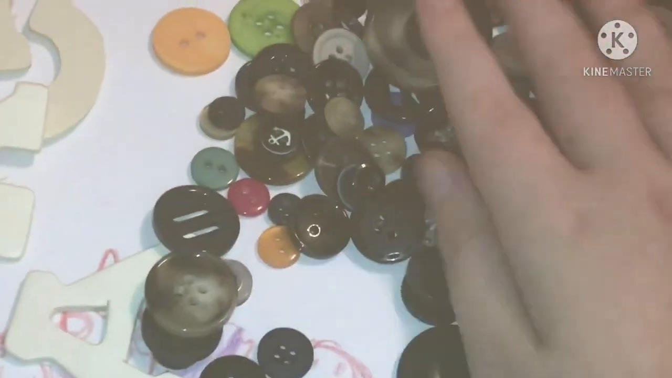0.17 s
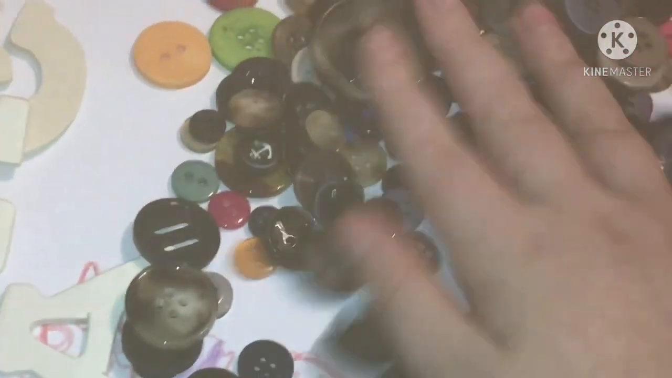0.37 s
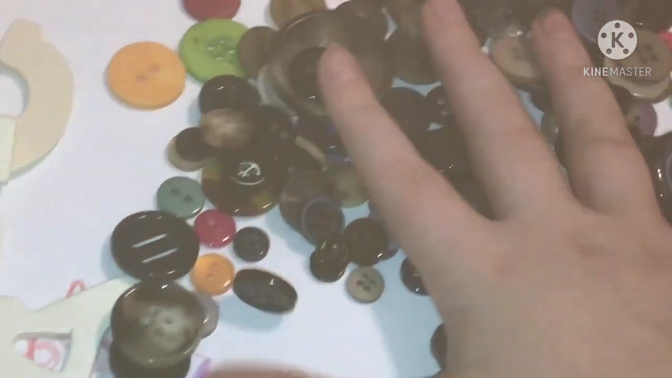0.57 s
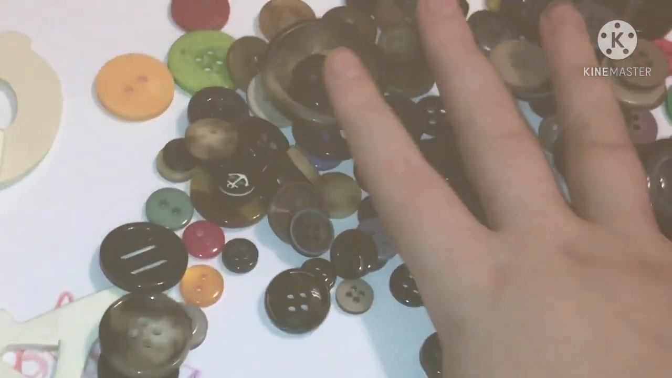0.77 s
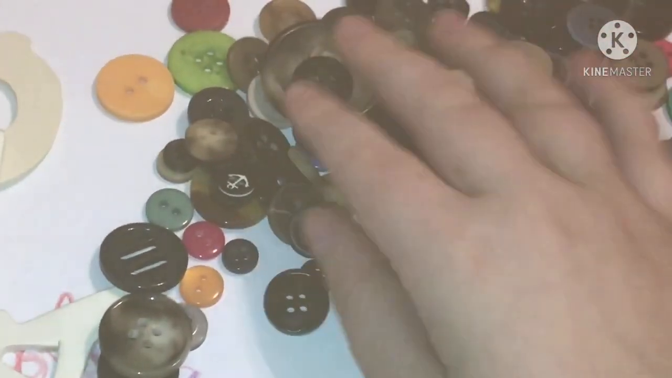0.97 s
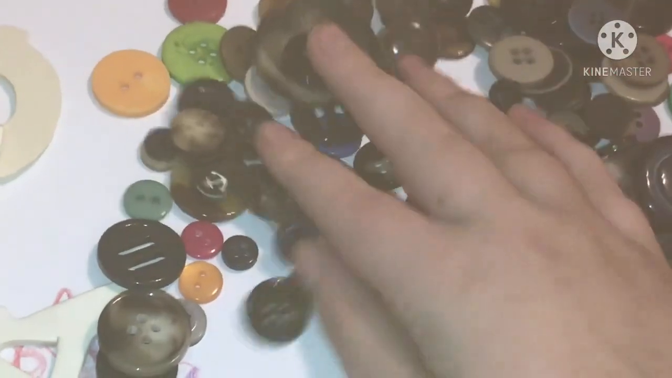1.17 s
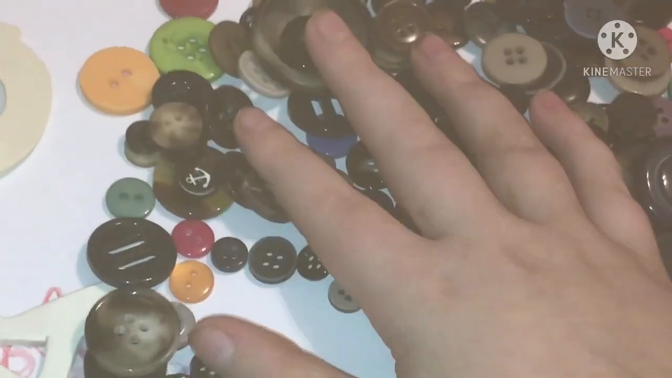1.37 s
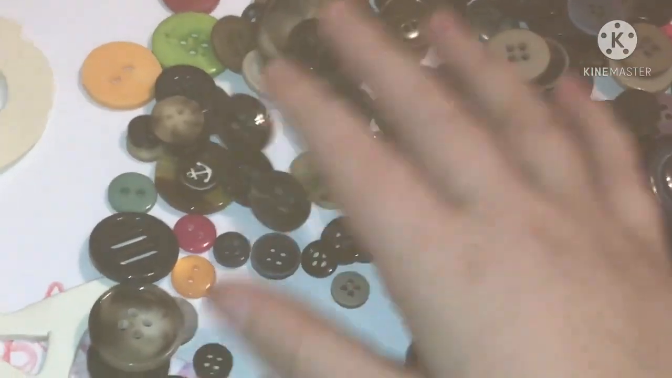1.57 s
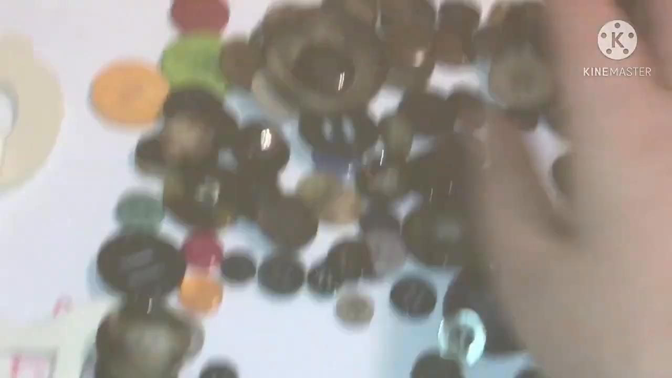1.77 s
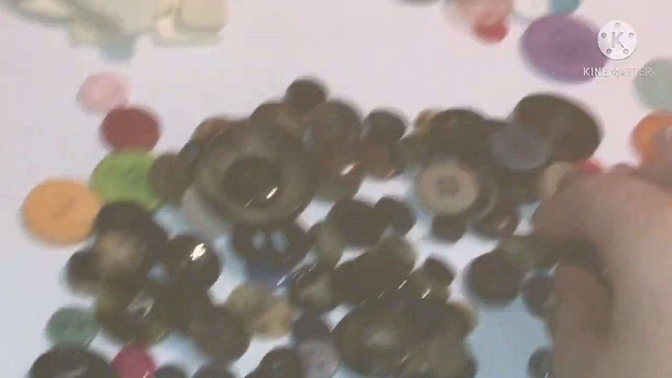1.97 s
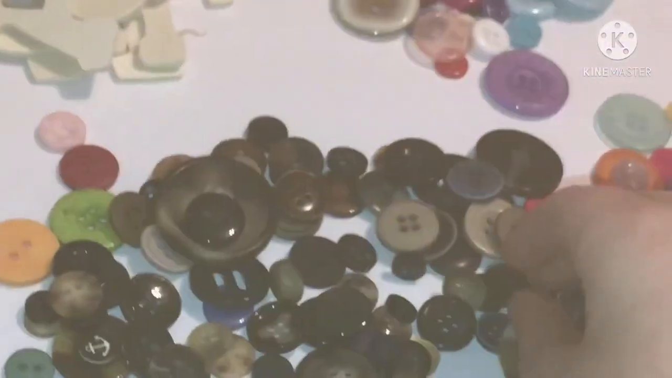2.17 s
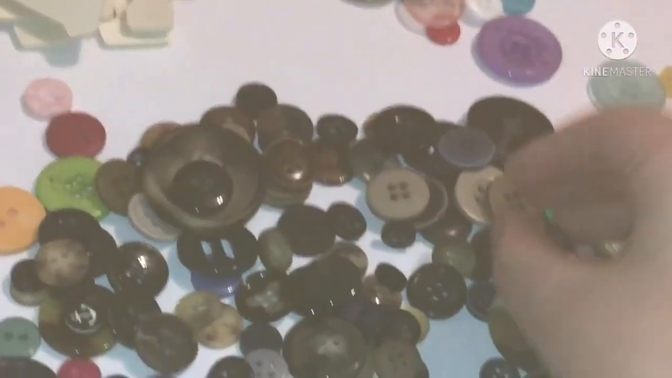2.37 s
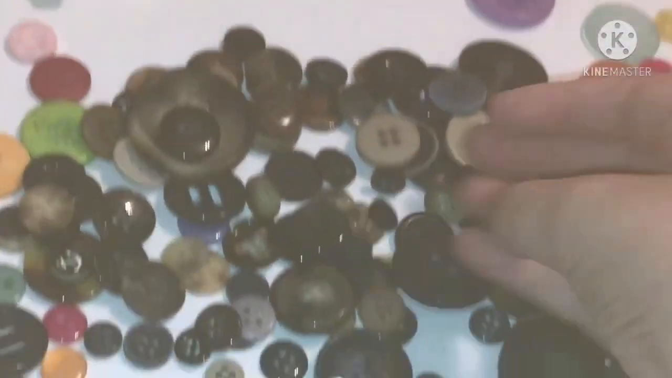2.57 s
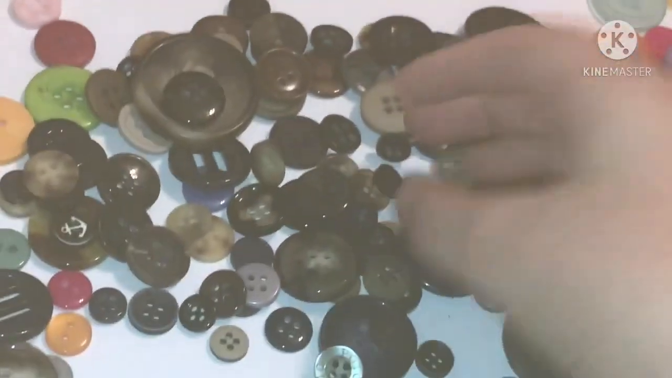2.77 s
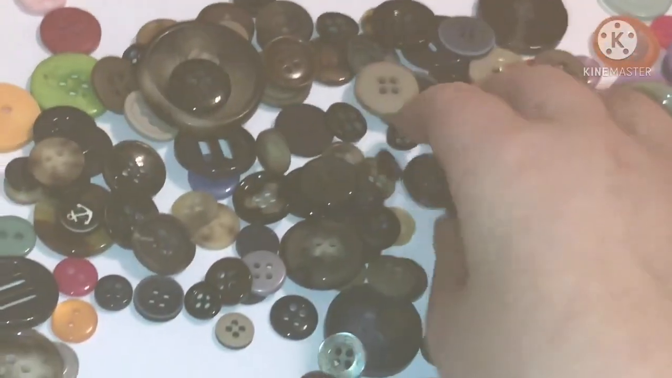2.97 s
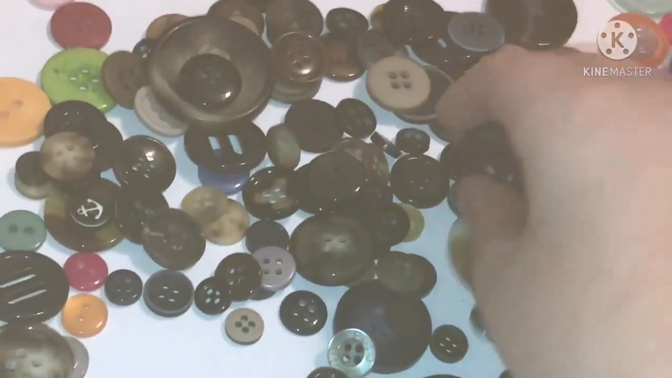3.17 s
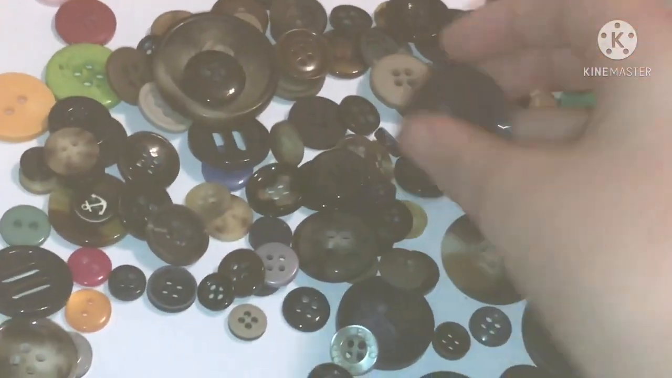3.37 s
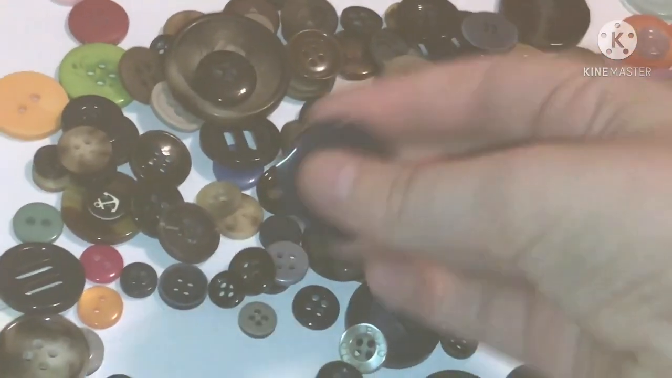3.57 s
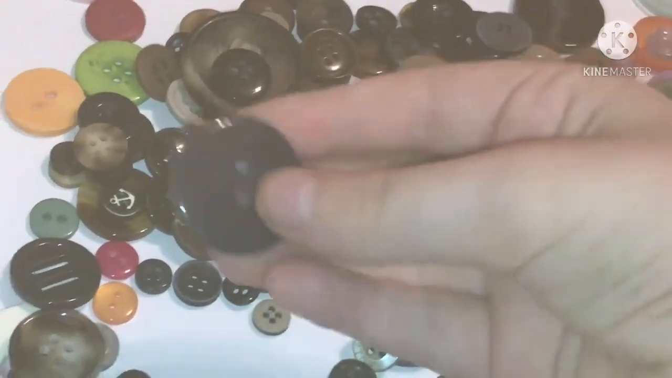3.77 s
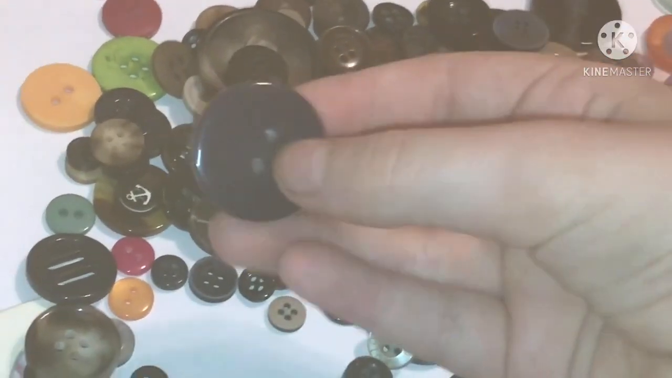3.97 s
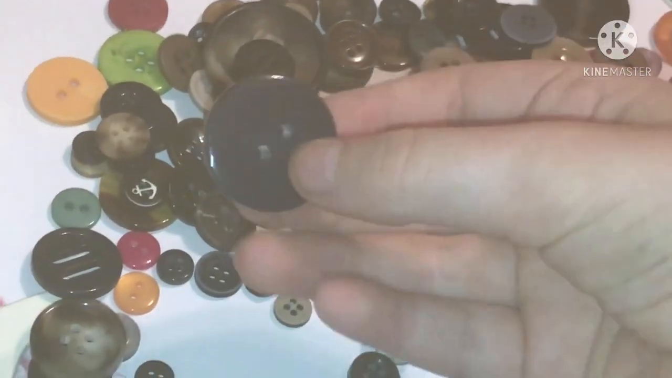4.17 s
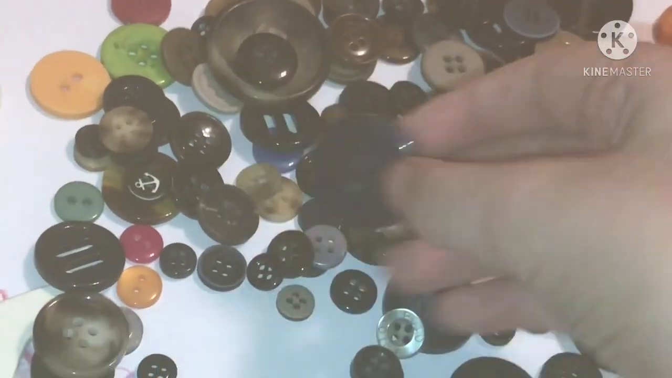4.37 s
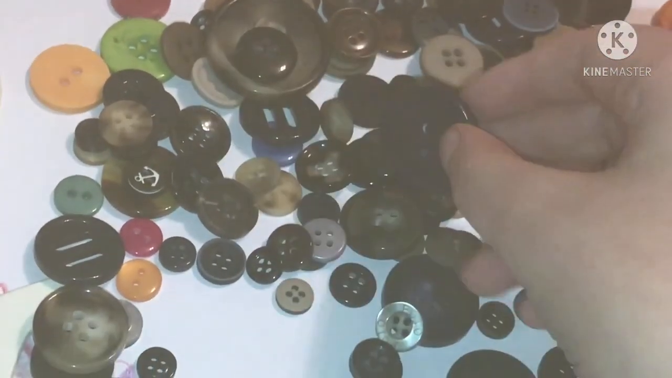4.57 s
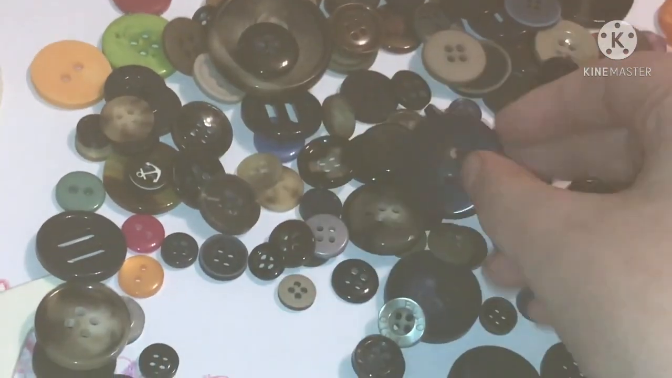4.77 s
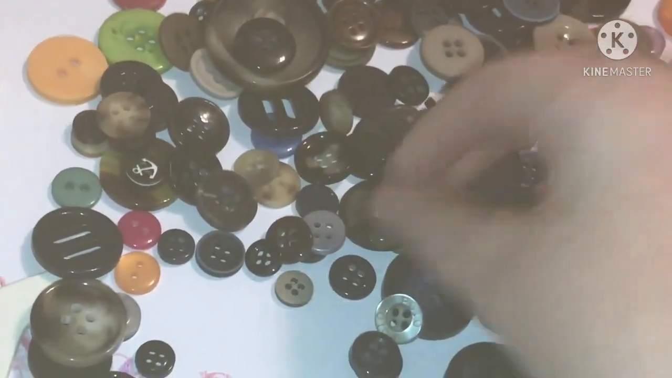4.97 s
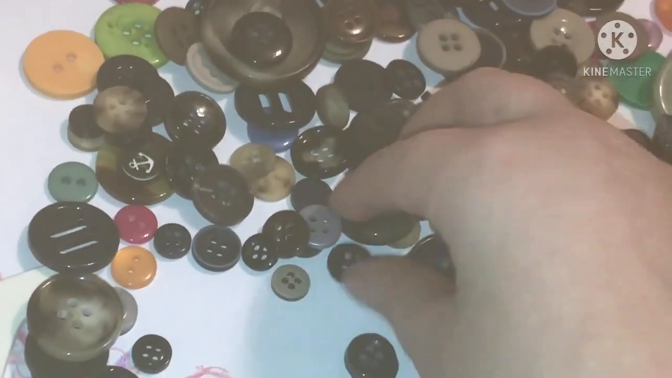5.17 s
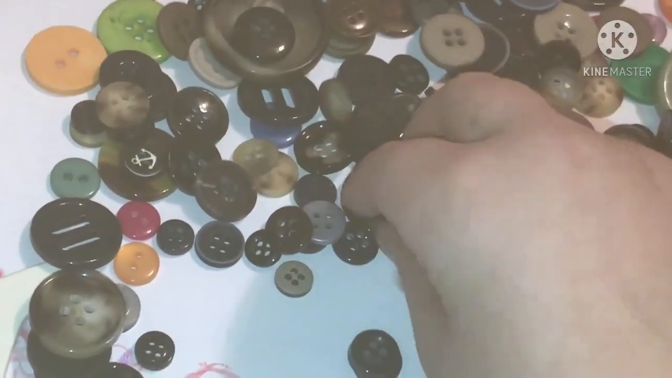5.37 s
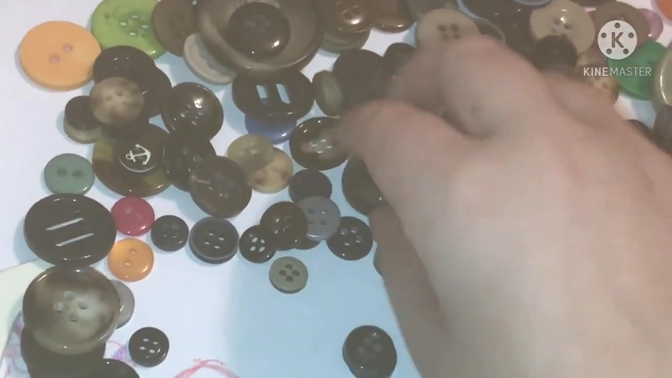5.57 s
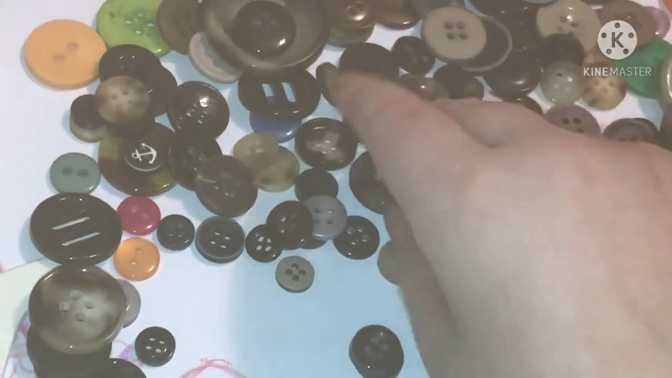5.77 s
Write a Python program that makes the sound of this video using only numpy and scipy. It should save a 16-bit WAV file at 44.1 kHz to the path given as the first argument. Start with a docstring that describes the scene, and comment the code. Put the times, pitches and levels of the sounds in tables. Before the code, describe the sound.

Bright clattering of many small buttons pushed around a hard surface in a quiet room, with a near-silent gap before more clicks.

```python
"""A small quiet room: a hand stirs plastic buttons on a hard board, lifts one out, puts it back, rummages on.
Each collision is a click of a few milliseconds: decaying sines for the board's knock and the discs' clack,
a coloured noise burst for the rims; the main clicks add a high rim note. Many small contacts make the sliding,
and one button rocks to rest. Squeaks are wandering tones, thin notes chatter taps; the room answers in
filtered noise over rumble, hiss and a whine."""
import sys
import numpy as np
from scipy import signal
from scipy.fft import rfft, irfft
from scipy.io import wavfile
from scipy.ndimage import uniform_filter1d

SR = 44100
rng = np.random.default_rng(int(sys.argv[2]) if len(sys.argv) > 2 else 0)


def int16_out(signal):
    """Quantize to a 16-bit WAV file."""
    q = np.round(np.clip(np.atleast_2d(signal).T, -1, 1) * 32767)
    wavfile.write(sys.argv[1], SR, q.astype(np.int16))


N = 256102
TIME = np.arange(N) / SR
CLICK_SAMPLES = 640

# spectrum of the rims' hard contact: hz, level_db
RIM_COLOUR = [(2200, -22.5), (3100, 6), (3800, 4.5), (4900, -1.5), (6000, 1), (7400, -6.5), (8700, -4),
              (10400, -9.5), (11800, -8), (13500, -12), (15500, -17)]


def undb(db):
    """Decibels to gain."""
    return 10 ** (np.asarray(db) / 20)


def unit(x):
    """Scale to rms 1."""
    return x / np.sqrt(np.mean(x ** 2))


def per_ms(waves):
    """Scale each short wave to the energy of one millisecond at rms 1."""
    return waves * np.sqrt(SR / 1000 / np.sum(waves ** 2, axis=-1, keepdims=True))


def decay(t_s, t60_s):
    """Exponential fade, 60 dB down after t60_s."""
    return np.exp(-np.log(1000) * t_s / t60_s)


def spread(*shape):
    """Normal deviates held within two deviations."""
    return np.clip(rng.standard_normal(shape), -2, 2)


def on_log(hz, points):
    """Read (Hz, value) points on a log-frequency axis."""
    f, value = np.transpose(points)
    return np.interp(np.log(np.maximum(hz, 1)), np.log(f), value)


def colour(x, points, size=4096):
    """Causal minimum-phase filter, built by folding the cepstrum of a (Hz, dB) response."""
    response_db = on_log(np.arange(size // 2 + 1) * SR / size, points)
    cepstrum = irfft(np.log(undb(response_db)))
    cepstrum[1:size // 2] *= 2
    cepstrum[size // 2 + 1:] = 0
    impulse = irfft(np.exp(rfft(cepstrum)))
    return signal.fftconvolve(x, impulse)[:N]


def band(x, lo_hz, hi_hz, order=2):
    """Band-pass along the last axis."""
    edges_hz = [lo_hz, min(hi_hz, SR / 2 - 1000)]
    return signal.sosfilt(signal.butter(order, edges_hz, "band", fs=SR, output="sos"), x)


def place(times_s, gains, waves):
    """Add short waves to the time line."""
    first = np.maximum(times_s * SR, 0).astype(int)
    index = first[:, None] + np.arange(waves.shape[1])
    return np.bincount(index.ravel(), (waves * gains[:, None]).ravel(), N)[:N]


def ring(hz, t60_s, size=CLICK_SAMPLES):
    """One dying sine for each pitch."""
    t = np.arange(size) / SR
    return np.sin(2 * np.pi * hz[:, None] * t) * decay(t, np.reshape(t60_s, (-1, 1)))


def clicks(note_db=-4.0, nudge_db=-11, nudge_s=0.0033):
    """The hardest collisions, each with its button's rim note; each nudges a neighbour an instant later."""
    # start_s, knock_db, clack_db, rim_db, rim_pitch_hz
    collisions = [(0.0288, -32.5, -38.5, -26.5, 3939), (.053, -38, -29, -19, 9490),
                  (0.1521, -22, -22, -48.5, 3827), (0.3042, -25, -28, -37, 3502),
                  (0.3192, -34.5, -35.5, -26, 2775), (0.3509, -19.5, -22.5, -11, 3793),
                  (0.4188, -41, -24, -16.5, 5792), (0.4408, -36, -42, -14.5, 6354),
                  (0.4684, -19.5, -21.5, -19, 8882), (.499, -30.5, -29.5, -20, 5564),
                  (0.569, -27.5, -27, -23.5, 2649), (0.5867, -30, -25.5, -31.5, 3760),
                  (.6164, -23, -31.5, -18.5, 9250), (.623, -28, -18.5, -14.5, 12360),
                  (0.6752, -42, -20.5, -28, 4868), (0.7606, -34, -24, -19.5, 3422),
                  (.768, -29, -22.5, -13, 5823), (0.7758, -31.5, -24, -30, 9856),
                  (0.8474, -35, -29, -30.5, 4287), (0.8866, -36, -25.5, -32.5, 3800),
                  (0.9236, -34.5, -23.5, -28.5, 2739), (0.9443, -25.5, -27, -38, 11970),
                  (0.9514, -35, -28.5, -29, 2990), (1.1321, -21.5, -28, -26.5, 11730),
                  (1.1492, -41, -25.5, -19, 2912), (1.2458, -49, -24, -20.5, 3061),
                  (1.2933, -16.5, -25.5, -31.5, 8265), (1.3006, -27.5, -24, -21.5, 2838),
                  (1.4692, -43.5, -40, -30.5, 6410), (1.5772, -30.5, -29.5, -26, 3018),
                  (1.7519, -31.5, -15.5, -30.5, 4364), (1.7575, -26.5, -12.5, -28.5, 4782),
                  (1.7907, -25.5, -15.5, -30.5, 5835), (1.8036, -29.5, -18, -24, 4361),
                  (1.8095, -38, -20, -27.5, 4050), (1.8201, -26, -20.5, -36.5, 5640),
                  (1.841, -29.5, -22.5, -48.5, 5677), (1.9599, -32, -29.5, -25, 7198),
                  (1.998, -26, -30, -18, 8634), (2.014, -36.5, -21.5, -18.5, 8229),
                  (2.0291, -32, -15.5, -20, 5996), (2.0517, -48, -27, -16, 5900),
                  (2.1178, -20.5, -32, -23, 9685), (2.1321, -42.5, -18.5, -25, 8735),
                  (2.336, -28.5, -17.5, -23, 5269), (2.4354, -38, -29, -26.5, 3500),
                  (2.5114, -20.5, -19.5, -18.5, 12280), (2.5162, -18, -21, -19, 3348),
                  (2.57, -2.5, -17, -12, 11020), (2.6129, -16, -22, -31.5, 12450),
                  (2.6211, -23, -27, -18, 6564), (2.638, -30, -25.5, -23.5, 12010),
                  (2.6901, -19.5, -19.5, -18, 8934), (2.7057, -33, -21.5, -33.5, 4244),
                  (2.7536, -39, -37, -34.5, 7941), (2.8297, -53, -34.5, -37, 4744),
                  (2.8586, -27.5, -28, -25, 9650), (2.8734, -18.5, -16.5, -18, 5108),
                  (2.9068, -15.5, -18, -24, 2719), (2.925, -21, -28, -29, 3780),
                  (2.94, -11, -17, -19.5, 6458), (2.9481, -15.5, -23, -25, 9510),
                  (2.9937, -23, -23, -25.5, 12230), (3.0308, -33.5, -15.5, -24, 3240),
                  (3.0341, -41.5, -17, -29.5, 5700), (3.0769, -39.5, -28.5, -27.5, 3160),
                  (3.095, -33.5, -23, -23.5, 2858), (3.1563, -50, -26.5, -25.5, 6100),
                  (3.2322, -25.5, -16, -16.5, 11680), (3.3524, -53.5, -28, -43, 5620),
                  (3.434, -16.5, -15.5, -23, 2873), (3.4692, -53, -27, -28, 4080),
                  (3.548, -40.5, -30.5, -40, 14330), (4.7496, -25, -28.5, -25, 8545),
                  (4.8781, -15, -18, -16.5, 6450), (4.8919, -12, -18, -15.5, 11540),
                  (4.922, -26.5, -31.5, -17, 6372), (5.444, -36, -28.5, -43.5, 4070),
                  (5.5405, -33, -25, -40, 3905), (5.578, -39, -31, -45, 5194),
                  (5.604, -24, -26, -29.5, 4219), (5.6079, -32, -36, -43, 3433),
                  (5.629, -43.5, -37, -36, 8613), (5.6796, -33, -25, -37, 4317),
                  (5.7237, -33.5, -35.5, -23.5, 8783), (5.732, -18.5, -21, -19.5, 9028),
                  (5.772, -29.5, -22, -26, 4027)]
    start_s, knock_db, clack_db, rim_db, rim_hz = np.transpose(collisions)
    note_waves = per_ms(band(ring(rim_hz, t60_s=.004), 2900, 16000, order=3))
    notes = place(start_s, undb(rim_db + note_db), note_waves)
    later_s = start_s + nudge_s * (.5 + .5 * rng.random(len(start_s)))
    # the board takes the nudge loss twice
    nudges = collide(later_s, knock_db + 2 * nudge_db, clack_db + nudge_db, rim_db + nudge_db)
    return collide(start_s, knock_db, clack_db, rim_db) + notes + nudges


def collide(times_s, knock_db, clack_db, crack_db, board_drop=0.006, disc_drop=.005, board_lag_s=.0002):
    """Rims touch, the discs clack, and the heavier board follows a moment later."""
    # a big button drives the board harder and sounds lower; drops are log pitch per dB
    weight_db = np.clip(knock_db - clack_db, -20, 20)
    board = place(times_s + board_lag_s, undb(knock_db), knocks(np.exp(-board_drop * weight_db)))
    discs = place(times_s, undb(clack_db), clacks(np.exp(-disc_drop * weight_db)))
    rims = place(times_s, undb(crack_db), cracks(len(times_s), t60_s=.0055))
    return board + discs + colour(rims, RIM_COLOUR)


def knocks(pitch, run=1):
    """The board under the buttons gives a dead, woody knock from its low modes."""
    # base_hz, t60_s, level_db
    board_modes = [(470, 0.013, -7.5), (690, 0.0055, -5.5), (1149.2, 0.0073994, 10.5)]
    return per_ms(band(strike(board_modes, pitch, detune=0.067, uneven_db=6.0, run=run), 420, 1500, order=3))


def clacks(pitch, run=1):
    """The discs clack flat against each other in short middle modes."""
    # base_hz, t60_s, level_db
    disc_modes = [(1800, .004, -6.5), (2075.3, 0.0076, 7.5), (2564.6, 0.0043, -6.5)]
    return per_ms(band(strike(disc_modes, pitch, detune=.08, uneven_db=11.0, run=run), 1410, 2990, order=3))


def strike(modes, pitch, detune, uneven_db, run=1):
    """One blow per pitch factor; modes vary between buttons, and one button takes `run` blows in a row."""
    count, out = len(pitch), 0
    for base_hz, t60_s, db in modes:
        chance = spread(count, 2)[np.arange(count) // run]
        gain = undb(db + uneven_db * chance[:, :1])
        out = out + gain * ring(base_hz * pitch * np.exp(detune * chance[:, 1]), t60_s)
    return out


def cracks(count, t60_s):
    """The hard first contact of two rims: a tiny noise burst standing for many high modes."""
    t = np.arange(CLICK_SAMPLES) / SR
    return per_ms(rng.standard_normal((count, CLICK_SAMPLES)) * decay(t, t60_s))


def pushing(range_db=30):
    """Gains of drag, chatter and scrape: each push swells by range_db, holds, and settles by as much."""
    # start_s, swell_s, hold_s, settling_s, chatter_db, board_drag_re_chatter_db, rim_scrape_re_chatter_db
    pushes = [(0., 0.003333, 0.13836, 0.10944, -47.5, -1, 0.5),
              (0.229, 0.0178, 0.1097, 0.0996, -49.5, 1, -2.5),
              (0.292, 0.02782, 0.071, 0.136, -39.5, -4.5, -1),
              (0.393, 0.041456, 0.05931, 0.04, -32.5, -4, 2),
              (0.477, 0.03434, 0.13242, 0.26077, -37, -3.5, -0.5),
              (0.743, 0.02038, 0.11572, 0.3206, -43.5, -3.5, -8.5),
              (1.092, 0.015936, 0.04861, 0.07325, -43, -2.5, 0),
              (1.164, 0.1143, 0.017495, 0.18348, -36, -2.5, 0),
              (1.501, 0.06953, 0.0477, 0.173, -39, -7, -9),
              (1.742, 0.048984, 0.04869, 0.1566, -33, -13.5, -16),
              (1.951, 0.01168, 0.05814, 0.0989, -37, -5.5, -1.5),
              (1.997, 0.05851, 0.01954, 0.35195, -34, -4, -3), (2.317, .025, .01, .1, -49, -5, -3),
              (2.502, 0.0129, 0.00787, 0.07147, -34.5, -2.5, -2),
              (2.548, 0.0207, 0.08509, 0.04698, -37, -1.5, -3.5),
              (2.684, 0.02083, 0.00674, 0.1249, -48, -3.5, 0.5),
              (2.841, 0.02027, 0.13617, 0.14498, -31, -7.5, -5),
              (3.005, 0.09874, 0.07438, 0.17, -40, -8, -5), (3.178, 0.03931, 0.0156, 0.20967, -33, -10, -8),
              (3.425, 0.0358, 0.05447, 0.11938, -43, -7.5, -7),
              (4.742, 0.00756, 0.00925, 0.149, -61.5, 4.5, 3),
              (4.872, 0.039408, 0.038747, 0.04948, -34, -2.5, -3.5),
              (5.112, 0.052817, 0.036876, 0.0877, -41, -5.5, -9),
              (5.228, 0.02816, 0.04397, 0.3058, -50, -5, -5.5),
              (5.421, 0.05301, 0.03032, 0.10624, -41, -10, -8.5),
              (5.575, 0.0283, 0.00933, 0.11164, -45.5, -0.5, -12),
              (5.679, 0.04061, 0.1015, .1, -39.5, -10, -6.5)]
    power = np.zeros((3, N))
    for start_s, swell_s, hold_s, settling_s, db, board_db, rim_db in pushes:
        since_full = TIME - start_s - swell_s
        before = np.maximum(-since_full / swell_s, 0)
        after = np.maximum((since_full - hold_s) / settling_s, 0)
        level = undb(db + np.array([[board_db], [0], [rim_db]]))
        power += level ** 2 * undb(-range_db * np.minimum(before + after, 10)) ** 2
    return np.sqrt(power)


def sliding(gains, count=3800, size=6, scatter_db=5, own_db=3, size_spread=0.088, rim_t60_s=0.0085, note_db=-7):
    """Hundreds of contacts a second; each button is jostled `size` times before the next takes over."""
    # size of the buttons under the hand: time_s, body_pitch_factor
    button_pitch = [(0., 0.9894), (.26, 0.9393), (.45, 1.0509), (.95, 0.9983), (1.3, 1.0073), (1.62, 1.166),
                    (1.8, 0.9207), (2.1, 1.2501), (2.6, 0.9474), (2.95, 1.0474), (3.2, 1.15), (3.5, 1.1166),
                    (4.9, 1.025), (5.3, 1.0321), (5.75, 0.8765)]
    # the flat palm rumbles the board more than fingertips do: time_s, rumble_re_drag_db
    palm = [(0., -3), (.5, -10), (1.3, -6.5), (2.1, -10), (2.6, -13), (5.8, -10)]
    drag, chatter, scrape = gains
    times_s = (np.arange(count) + 2 * rng.random(count)) * N / SR / count
    chance = spread(count, 4).T
    knock, clack, crack = undb(scatter_db * chance[0] + own_db * chance[1:])
    sizes = np.exp(size_spread * rng.standard_normal(count))[np.arange(count) // size]
    pitch = np.interp(times_s, *np.transpose(button_pitch)) * sizes
    rim_hz = rng.uniform(2800, 15500, count)
    rumble_gain = undb(np.interp(TIME, *np.transpose(palm)))
    rumble = rumble_gain * unit(band(rng.standard_normal(N), 160, 420))
    board = unit(place(times_s, knock, knocks(pitch, run=size))) + rumble
    discs = unit(place(times_s, clack, clacks(pitch, run=size)))
    ticks = cracks(count, t60_s=0.013) + undb(note_db) * per_ms(ring(rim_hz, rim_t60_s))
    rims = unit(colour(place(times_s, crack, ticks), RIM_COLOUR))
    return board * drag + discs * chatter + rims * scrape


def tumbling(gains, count=330, knock_db=4, clack_db=6, crack_db=5, scatter_db=3):
    """Dozens of times a second a pushed button slips off its neighbour: a light click somewhat above the push."""
    times_s = (np.arange(count) + rng.random(count)) * (N - 1) / SR / count
    push_db = 20 * np.log10(gains[:, (times_s * SR).astype(int)])
    force_db = push_db + scatter_db * spread(count)
    return collide(times_s, force_db[0] + knock_db, force_db[1] + clack_db, force_db[2] + crack_db)


def rocking(first_db=-27, loss_db=1.7781, knock_db=-11, crack_db=-9, count=10):
    """One button rocks to rest, its taps ever quicker and weaker."""
    start_s, gap_s, shrink = .9757, .0217, .862
    k = np.arange(count)
    db = first_db - loss_db * k
    gaps_s = gap_s * shrink ** k
    times_s = start_s + np.cumsum(gaps_s) - gaps_s
    return collide(times_s, db + knock_db, db, db + crack_db)


def skids():
    """A button sticks and slips on the board: a rough squeak whose phase wanders."""
    # start_s, length_s, first_pitch_hz, last_pitch_hz, level_db, line_width_hz
    squeaks = [(0.238, 0.05905, 1336, 1250, -39.5, 250), (2.436, 0.06733, 636.2, 610.8, -57.5, 60),
               (4.701, 0.04526, 4250, 4050, -68, 151), (4.796, 0.092, 1069, 746, -61.5, 25),
               (5.166, 0.008312, 1026, 1140, -33.5, 120)]
    out = np.zeros(N)
    for start_s, length_s, first_hz, last_hz, db, width_hz in squeaks:
        n, at = int(length_s * SR), int(start_s * SR)
        glide = 2 * np.pi * np.linspace(first_hz, last_hz, n) / SR
        wander = np.sqrt(2 * np.pi * width_hz / SR) * rng.standard_normal(n)
        grip = np.abs(uniform_filter1d(rng.standard_normal(n), size=200))  # friction comes and goes
        rough = grip * np.sin(np.cumsum(glide + wander))
        note = band(rough, first_hz / np.sqrt(2), first_hz * np.sqrt(2))
        out[at:at + n] += undb(db) * unit(note * signal.windows.tukey(n, .5))
    return out


def pings(tap_t60_s=.012, taps_per_s=260, bounce_db=-7):
    """A small hard button taps, then chatters ever more lightly; each touch rings its thin high note."""
    # start_s, pitch_hz, level_db, chatter_t60_s
    shivers = [(0.027, 9774, -24.5, 0.2496), (.090, 11960, -28, 0.165), (0.9439, 12000, -19.5, 0.0429),
               (0.963, 12170, -31.5, 0.165), (.69, 10000, -32, .08), (2.632, 11650, -24.5, 0.029),
               (2.689, 8930, -18.5, .09), (5.148, 11990, -41.5, 0.094)]
    start_s, hz, db, t60_s = np.transpose(shivers)
    t = np.arange(SR // 5) / SR
    chance = rng.random((len(start_s), 2, len(t)))
    touches = (chance[:, 0] < taps_per_s / SR) * chance[:, 1]
    taps = touches * undb(bounce_db) * decay(t, t60_s[:, None])
    taps[:, 0] = 1
    return place(start_s, undb(db), signal.fftconvolve(taps, ring(hz, tap_t60_s), axes=1))


def room(x, near_db=-12, near_t60_s=.016, wall_s=0.018, wall_db=-21):
    """Quick scatter from hand and table, one wall echo and a short diffuse tail, all shaped noise."""
    # hz, t60_s
    tail_t60 = [(1000, 0.61), (2500, 0.22), (15000, .27)]
    # hz, band_level_db
    tail_level = [(200, -13.5), (1000, -21.5), (2500, -15.5), (6000, -15), (15000, -26.5)]
    t = np.arange(SR * 6 // 10) / SR
    edges_hz = np.geomspace(140, 17000, 9)
    tail = 0
    for lo, hi in zip(edges_hz, edges_hz[1:]):
        centre_hz = np.sqrt(lo * hi)
        fade = decay(t, on_log(centre_hz, tail_t60)) * np.clip(t / .008, 0, 1)
        gain = undb(on_log(centre_hz, tail_level)) / np.linalg.norm(fade)
        tail = tail + gain * fade * band(rng.standard_normal(len(t)), lo, hi, order=3)
    near = rng.standard_normal(len(t)) * decay(t, near_t60_s) * (t > .001)
    wall = rng.standard_normal(len(t)) * np.exp(-np.abs(t - wall_s) / .0012)
    near_part = undb(near_db) * near / np.linalg.norm(near)
    wall_part = undb(wall_db) * wall / np.linalg.norm(wall)
    return x + signal.fftconvolve(x, tail + near_part + wall_part)[:N]


def background(quiet_db=-58.5, whine_db=-81):
    """Steady low rumble of the house and faint microphone hiss in coloured noise; a thin whine near 12 kHz."""
    # hz, relative_level_db_per_hz
    quiet_colour = [(25, -23.5), (45, -7.5), (60, 1.5), (100, -2.5), (150, -14), (200, -8), (310, -18.5),
                    (630, -23.5), (1600, -31), (4000, -34), (10000, -40), (16000, -39.5)]
    quiet = unit(colour(rng.standard_normal(N), quiet_colour))
    whine = unit(band(rng.standard_normal(N), 11700, 12150))
    return undb(quiet_db) * quiet + undb(whine_db) * whine


def scene():
    """All the buttons, in their room."""
    gains = pushing()
    buttons = clicks() + sliding(gains) + tumbling(gains) + rocking() + skids() + pings()
    return (room(buttons) + background())[None]


def record(dry, top_hz=15900):
    """The close microphone clips past full scale; a steep low-pass cuts the top."""
    low_pass = signal.ellip(10, .2, 70, top_hz, fs=SR, output="sos")
    return signal.sosfilt(low_pass, np.clip(dry, -1, 1))


dry = scene()
out = record(dry)
int16_out(out)
```